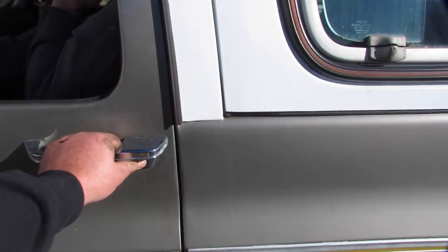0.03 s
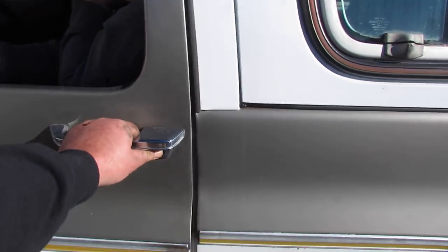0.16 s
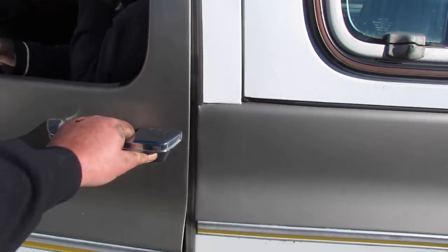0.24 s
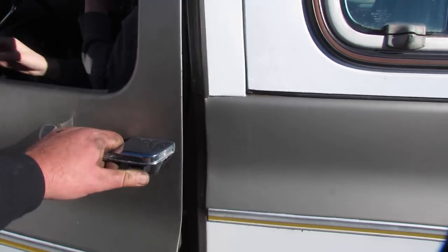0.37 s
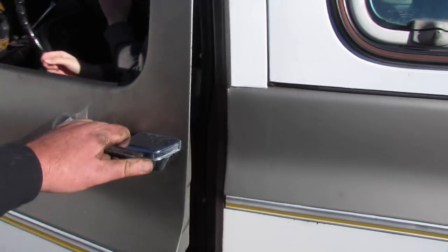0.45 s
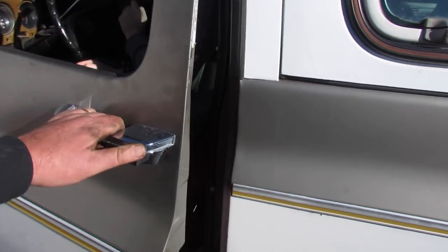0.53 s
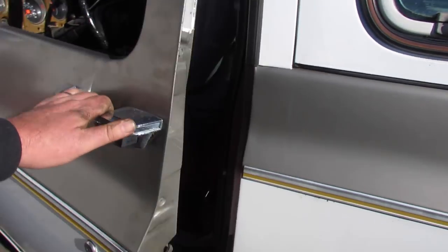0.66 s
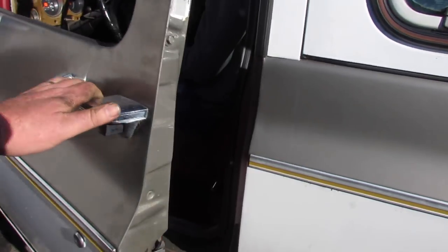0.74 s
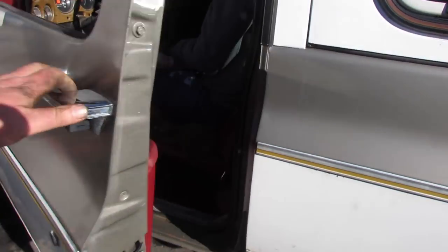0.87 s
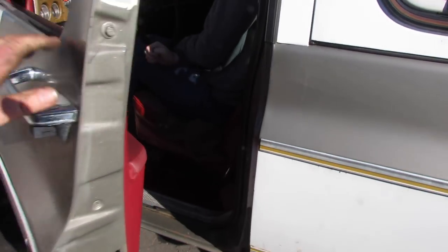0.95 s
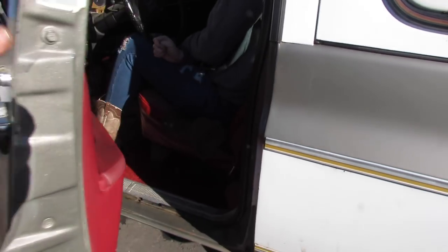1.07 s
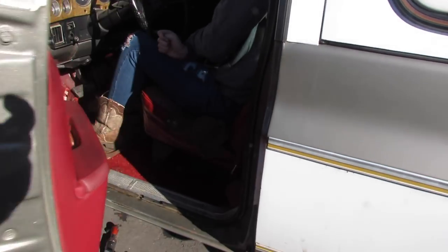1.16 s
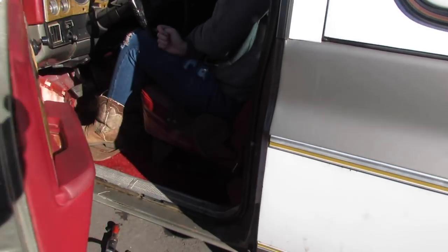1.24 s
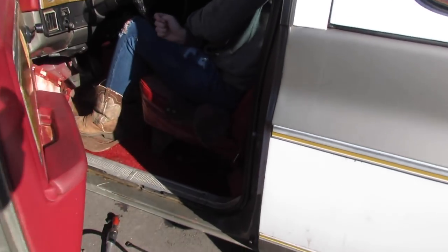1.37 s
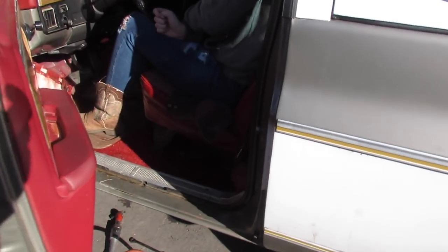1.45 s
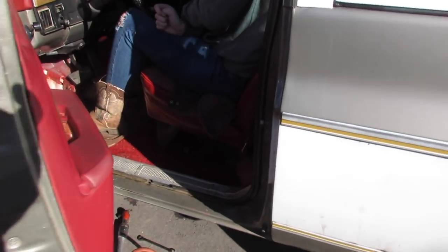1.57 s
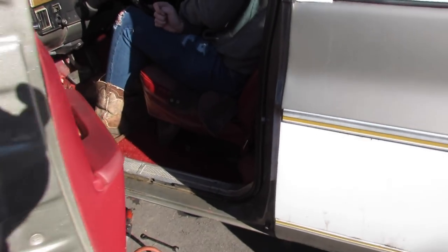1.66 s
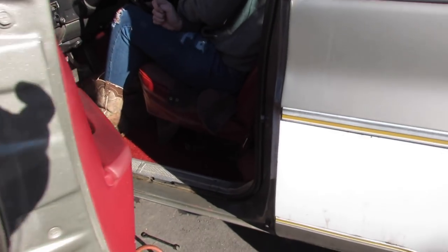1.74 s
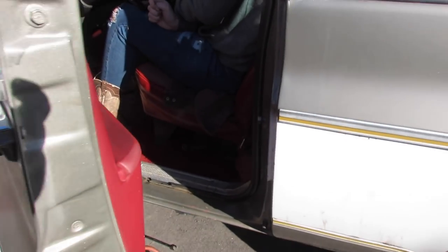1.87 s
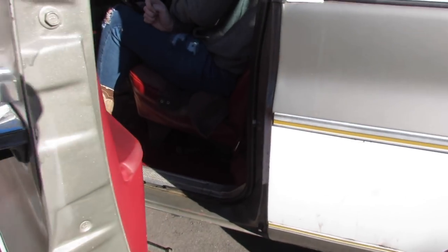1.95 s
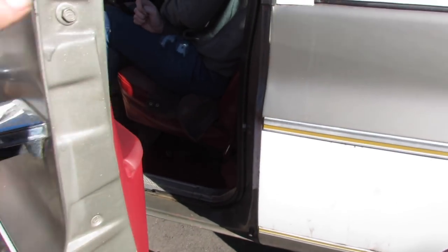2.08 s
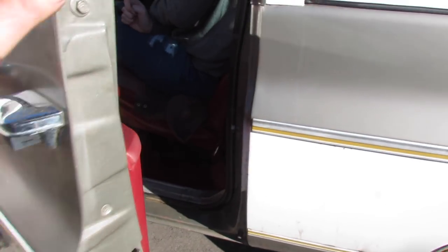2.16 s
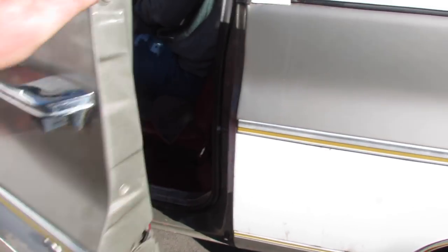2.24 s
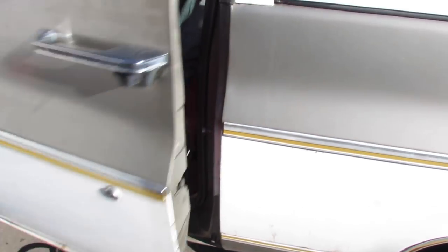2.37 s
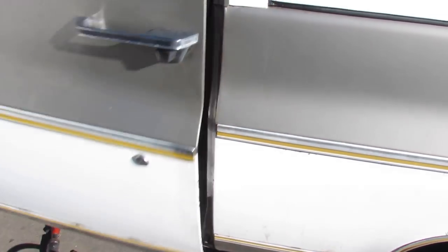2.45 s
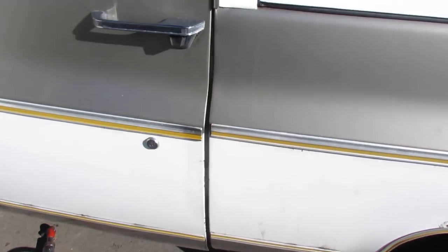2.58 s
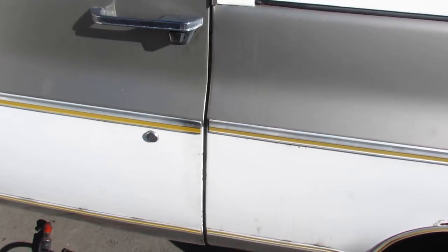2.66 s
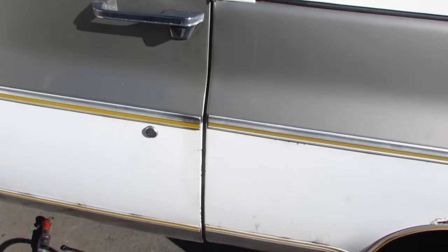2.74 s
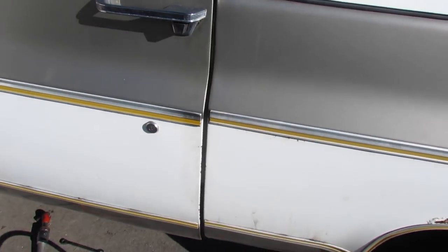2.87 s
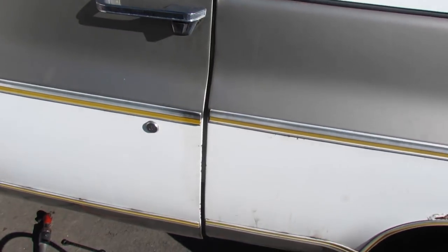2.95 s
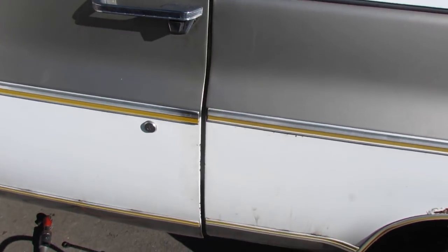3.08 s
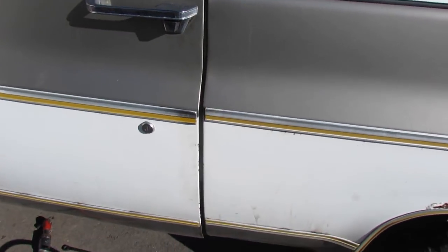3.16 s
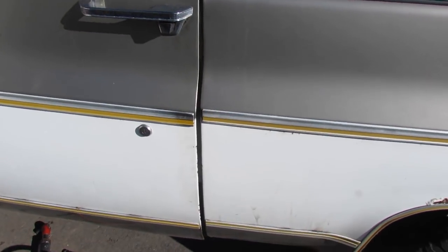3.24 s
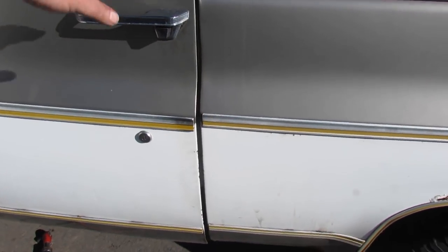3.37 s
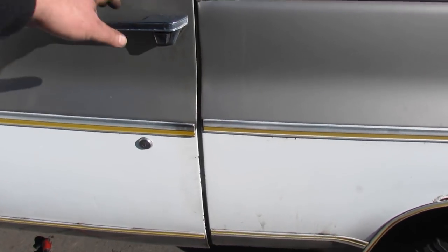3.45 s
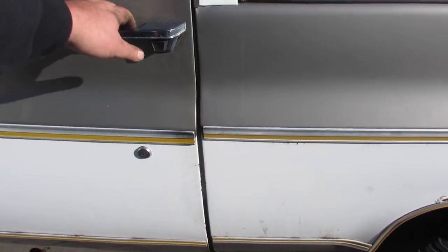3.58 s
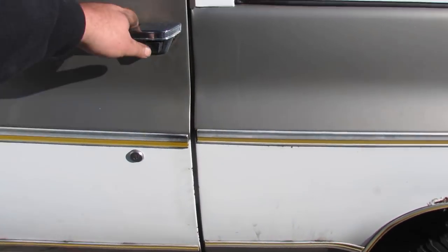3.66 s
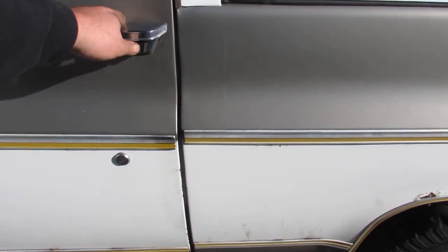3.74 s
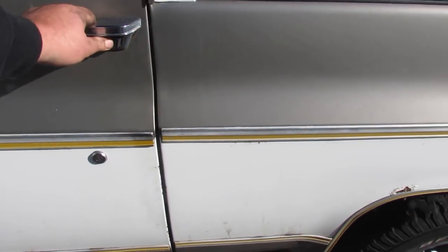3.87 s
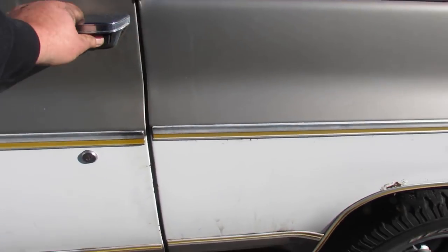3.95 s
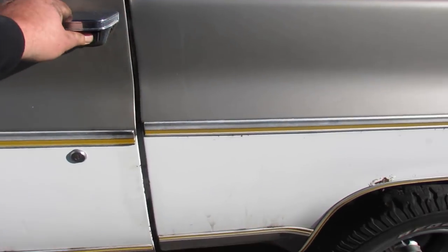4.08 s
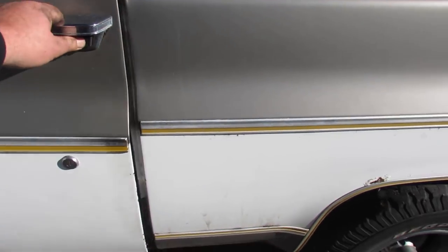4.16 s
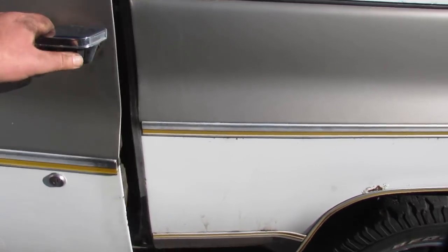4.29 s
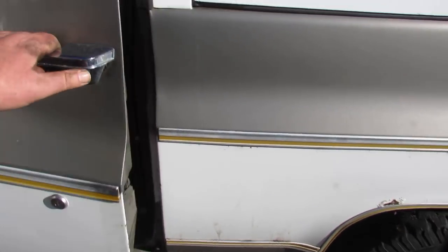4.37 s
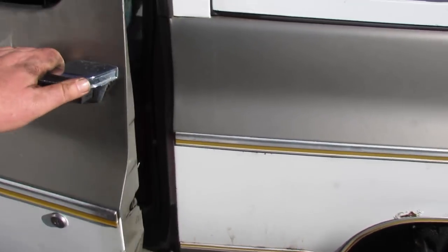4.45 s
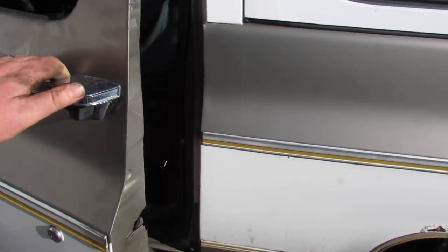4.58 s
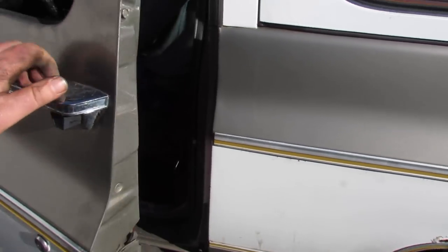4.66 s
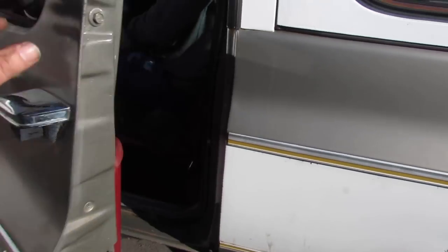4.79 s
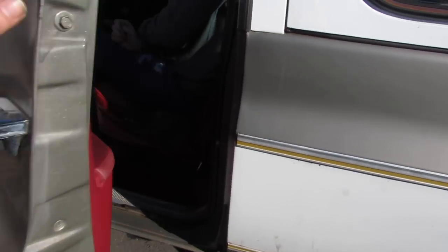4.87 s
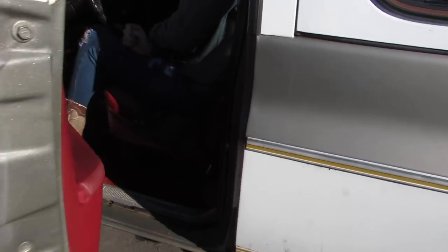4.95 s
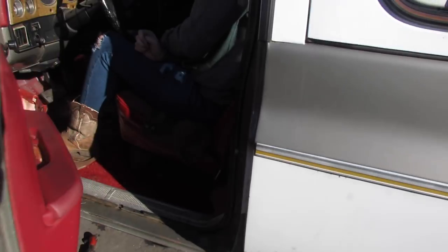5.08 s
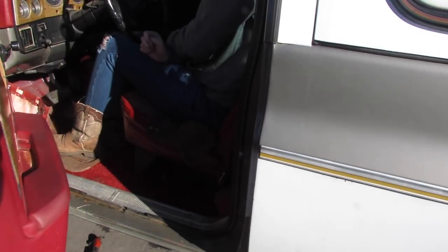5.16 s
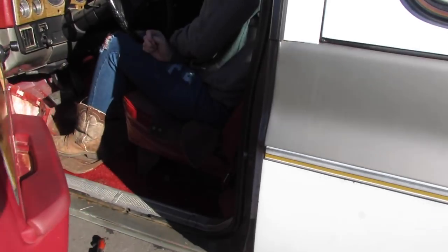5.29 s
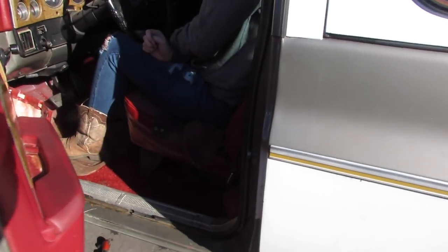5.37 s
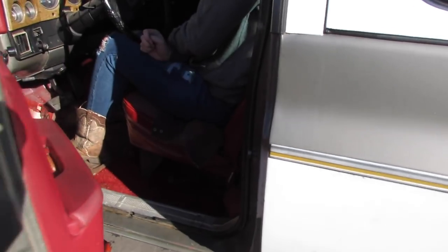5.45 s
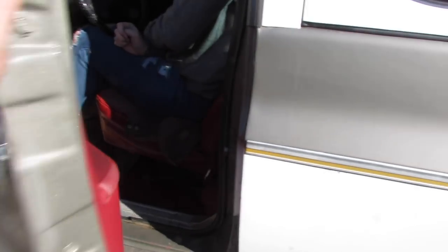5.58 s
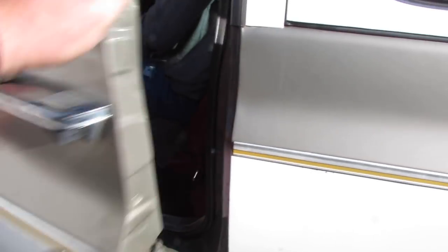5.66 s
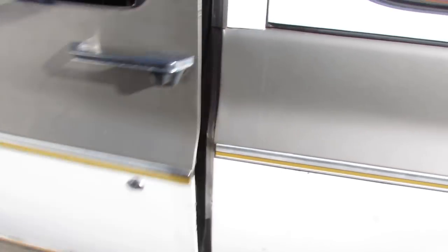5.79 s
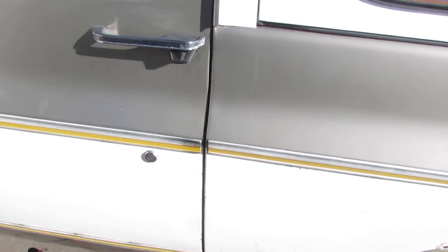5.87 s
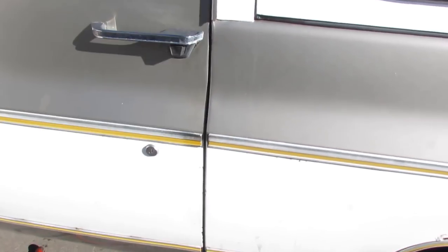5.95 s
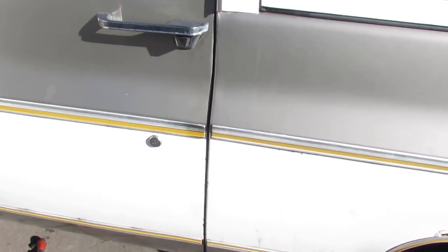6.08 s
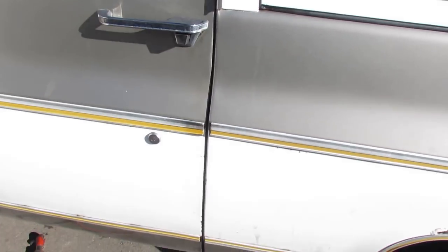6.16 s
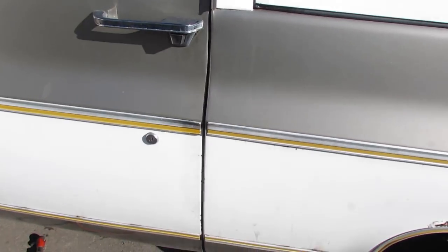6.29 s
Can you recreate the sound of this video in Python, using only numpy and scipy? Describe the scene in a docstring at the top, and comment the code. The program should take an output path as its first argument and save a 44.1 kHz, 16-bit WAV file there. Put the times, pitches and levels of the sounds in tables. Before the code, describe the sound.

An old vehicle's heavy steel door pops open with a crunch and latch clack, slams hard, then opens and slams again harder outdoors.

```python
"""An old truck's steel door is opened and slammed twice, outdoors and at arm's length, in steady rumble and hiss.
It pops off its seal with a crunch, the latch clacks free, the hinge grates, and the slam cracks and booms.
Then the button handle knocks, the latch lets go again, the stay bumps, and a harder slam leaves a spring singing.
Dense steel is decaying noise bands, distinct parts are decaying sines, and squeaks are wavering tones.
Loud peaks pull an automatic gain down; it holds, then creeps back."""
import sys
import numpy as np
from scipy import signal
from scipy.io import wavfile
from scipy.ndimage import minimum_filter1d

SR = 44100
rng = np.random.default_rng(int(sys.argv[2]) if len(sys.argv) > 2 else 0)


def unload_wav(signal):
    """Save mono or channel-first audio to the path in sys.argv[1] as 16-bit WAV at rate SR, clipped to [-1, 1]."""
    wavfile.write(
        sys.argv[1],
        SR,
        np.round(np.clip(np.atleast_2d(signal).T, -1, 1) * 32767).astype(np.int16),
    )


N = 278867

BAND_EDGES = 25 * 2 ** np.arange(0, 9.6, .5)   # half octaves, Hz
BAND_HZ = np.sqrt(BAND_EDGES[1:] * BAND_EDGES[:-1])
# resonances of the door panel: (f/Hz, width/Hz, level/dB)
PANEL = [(196, 20, -3), (280.4, 12, -4), (358, 15, -3), (732, 7.3, -3), (1490, 99, -4.5), (1723, 45, -2),
         (2025, 50, -3.5), (2417, 39, -3.5), (2690, 34, -6), (3017, 30, -7.5), (4100, 220, -11.5),
         (5013, 30, -8), (5850, 350, -8), (7070, 60, -1.5), (7350, 110, 0), (7920, 45, -1.5),
         (8600, 100, -4.5)]
# modes of the door skin: (f/Hz, level/dB, t60/s)
SKIN = [(112, -35, 0.27), (181, -24.5, .42), (385, -21, 0.14), (447, -19, .23), (655, -6.5, 0.03),
        (744, -20, 0.2), (772, -9, 0.085), (1357, -27, .16), (1728, -26, .13)]
# slams: (latch lands t/s, door speed/(m/s), t60 of the frame/s, t60 of the seating/s)
SLAMS = [(2.6027, 1.0, 0.6, 0.0743), (5.9363, 1.4, 0.37, 0.24)]
OVERSHOOT_M = 0.0098   # how far the door travels past the latch point until it seats
SLAM_DB_PER_DOUBLING = 2.5   # of the door speed
GRATE_START_S, GRATE_LENGTH_S = 1.039, 0.1146


def from_db(db):
    """Decibels to gain."""
    return 10 ** (np.asarray(db) / 20)


def rms_one(x):
    """Scale to an rms of 1."""
    return x / np.sqrt(np.mean(x ** 2) + 1e-20)


def at_hz(points, hz):
    """Read a spectrum on a log-frequency axis."""
    f, value = np.transpose(points)
    return np.interp(np.log(hz), np.log(f), value)


def add(out, s, sound):
    """Mix a sound in at a time."""
    start = max(round(s * SR), 0)
    out[..., start:start + sound.shape[-1]] += sound[..., :N - start]


def drift(rate_hz, size=N):
    """Smooth chance of spread 1, drawn at every 16th sample."""
    r = np.exp(-2 * np.pi * rate_hz * 16 / SR)
    draws = rng.standard_normal(size // 16 + 3002)
    slow = signal.lfilter([1], [1, -2 * r, r * r], draws)[3000:]   # skip the filter's start-up
    return np.interp(np.arange(size) / 16, np.arange(len(slow)), rms_one(slow))


def band_pass(x, order, edges_hz):
    """Keep only what lies between two edges."""
    return signal.sosfilt(signal.butter(order, edges_hz, "band", fs=SR, output="sos"), x)


def low_pass(x, cutoff_hz):
    """Take the treble off above a cutoff."""
    return signal.sosfilt(signal.butter(4, cutoff_hz, fs=SR, output="sos"), x)


def noise_bands(width):
    """Half-octave bands of stereo noise, each of rms 1: bands x 2 x N."""
    # (f/Hz, left minus right level/dB)
    balance = [(50, -3.5), (250, -0.8), (500, -1), (1000, -1.7), (4000, -0.4), (14000, 0)]
    white, bands = rng.standard_normal((2, 2, N)), []
    for k, hz in enumerate(BAND_HZ):
        mid, side = band_pass(white[k % 2], 2, BAND_EDGES[k:k + 2])   # neighbours use different noise
        pair = mid + from_db(at_hz(width, hz)) * side * [[1], [-1]]
        left_right_db = at_hz(balance, hz) / 2 * np.array([[1], [-1]])
        bands.append(rms_one(pair * from_db(left_right_db)))
    return np.array(bands, dtype=np.float32)


def resonate(x, resonances):
    """A sound plus the ringing that it raises in a body."""
    out = x.copy()
    for hz, width, db in resonances:
        r = np.exp(-np.pi * width / SR)
        poles = [1, -2 * r * np.cos(2 * np.pi * hz / SR), r * r]
        out += from_db(db) * (1 - r * r) / 2 * signal.lfilter([1, 0, -1], poles, x + 1e-18)
    return out


def blows(table, bands, colour_db, t60, pan_db, rattle_db, snap_db, snap_t60,
          tail_db, tail_stretch, damping, rise_s):
    """Noise bands stand for dense steel modes: each blow (s, dB, tilt) has a snap, a ring and a fainter tail."""
    # where each kind of blow has its colour set: (f/Hz)
    colour_hz = (200, 900, 3000, 9000)
    pivot_hz = 1800   # a blow's tilt turns about this
    out = np.zeros((2, N))
    chatter = from_db(rattle_db * (drift(200) - 1 / 10 * rattle_db))   # loose parts buzz against each other
    colour = from_db(at_hz(list(zip(colour_hz, colour_db)), BAND_HZ))
    colour = colour / (1 + (105 / BAND_HZ) ** 3)   # a panel radiates little deep bass
    colour = colour / np.sqrt(1 + (BAND_HZ / 11000) ** 6)
    for (s, db, tilt), ring_s in zip(table, np.broadcast_to(t60, len(table))):
        start = round(s * SR)
        t = (np.arange(min(int(ring_s * tail_stretch * SR), N - start)) / SR).astype(np.float32)
        # t60 holds at 1 kHz; higher bands die sooner
        decay = np.outer((BAND_HZ / 1000) ** damping, t).astype(np.float32)
        ring = np.exp(-np.log(1000) / ring_s * decay)
        tail = from_db(tail_db) * ring ** np.float32(1 / tail_stretch)
        snap = from_db(snap_db - 60 * t / snap_t60)
        # a mode builds over the contact, or over one cycle if that is longer
        rise = np.minimum(t / np.maximum(1 / BAND_HZ, rise_s)[:, None], 1)
        gains = colour * from_db(db + tilt * np.log2(BAND_HZ / pivot_hz))
        envelope = gains[:, None] * rise * np.sqrt(ring ** 2 + tail ** 2 + snap ** 2)
        add(out, s, np.einsum("bt,bct->ct", envelope, bands[:, :, start:start + len(t)]))
    return out * chatter * from_db([[pan_db / 2], [-pan_db / 2]])


def strikes(hits, modes, spread_db=0):
    """A hard contact rings a few distinct modes; a loose part shares them out differently each time."""
    out, t = np.zeros(N), np.arange(int(2 * SR * max(t60 for *_, t60 in modes))) / SR
    rings = np.array([from_db(db - 60 * t / t60) * np.sin(2 * np.pi * hz * t) for hz, db, t60 in modes])
    for (s, db), luck in zip(hits, rng.standard_normal((len(hits), len(modes)))):
        add(out, s, from_db(db + spread_db * luck) @ rings)
    return out


def squeaks(table, waver=0.031, grip_db=5.0):
    """Dry metal sliding: short tones whose pitch and strength waver as it sticks and slips."""
    out = np.zeros(N)
    for s, length, hz, db in table:
        size = int(length * SR)
        phase = 2 * np.pi * np.cumsum(hz * (1 + waver * drift(500, size))) / SR
        grip = rms_one(from_db(grip_db * drift(150, size)))
        fade = signal.windows.tukey(size, .5)
        add(out, s, from_db(db) * np.sqrt(2) * fade * grip * np.sin(phase))
    return out


def air_layer(bands, spectrum, patchy_db, rate_hz):
    """Steady noise whose bands swell each on their own; rms 1."""
    gains = from_db(at_hz(spectrum, BAND_HZ)) * np.sqrt(BAND_HZ)   # per-Hz density to band level
    return rms_one(sum(g * from_db(patchy_db * drift(rate_hz)) * band for g, band in zip(gains, bands)))


def sleeve():
    """A sleeve brushes past: swells of band-limited noise."""
    # (t/s, length/s, level/dB)
    brushes = [(2.25, 0.6, -56), (4.955, 0.14, -46), (5.765, 0.1, -46.5)]
    stroke = np.zeros(N)
    for start, length, db in brushes:
        add(stroke, start, from_db(db) * np.hanning(int(length * SR)))
    cloth = band_pass(rng.standard_normal((2, N)), 2, [5000, 13500])
    return stroke * rms_one(cloth)


def outdoors():
    """A lumpy low rumble, a smooth hiss, and cloth brushing close by."""
    # outdoor air through each opening of the door: (t/s, rumble level/dB, hiss level/dB), before the trims
    air_level = [
        [(0.0, -43.5, -52.5), (0.33, -42, -45.5), (0.49, -43.5, -49.5), (2.21, -45.5, -52.5), (2.4, -41.5, -51)],
        [(4.0, -38.5, -39), (4.102, -35.5, -43.5), (4.498, -42, -49), (5.726, -42.5, -49.5), (5.85, -36.5, -50),
         (6.2, -44, -46)],
    ]
    # spectra of the two layers: (f/Hz, level per Hz/dB)
    rumble_spectrum = [(15, -45), (25, -10.5), (119, -1.5), (176, -2), (207, -2.5), (353, -4.5), (462, -7),
                       (514, -10), (661, -6.5), (1070, -13), (1800, -24.5), (2340, -43), (3960, -120)]
    hiss_spectrum = [(880, -28), (1500, 1), (2040, -4.5), (3620, -5), (4420, -8), (7320, -12.5),
                     (12200, -17.5), (15100, -27), (16000, -8)]
    # width of the air: (f/Hz, side minus mid level/dB)
    air_width = [(60, -2), (180, -11.5), (550, -6), (1650, 1.5), (4970, -3.5), (15000, 3)]
    rumble_trim_db, hiss_trim_db = 2, 3
    bands, (s, rumble_db, hiss_db) = noise_bands(air_width), np.concatenate(air_level).T
    t = np.arange(N) / SR
    rumble = air_layer(bands, rumble_spectrum, patchy_db=1.97, rate_hz=7.1)
    hiss = air_layer(bands, hiss_spectrum, patchy_db=0.74, rate_hz=4.1)
    rumble = rumble * from_db(rumble_trim_db + np.interp(t, s, rumble_db))
    hiss = hiss * from_db(hiss_trim_db + np.interp(t, s, hiss_db))
    return rumble + hiss + sleeve()


def jolts(bands):
    """The whole door shudders; the jolt that pops it off its seal also kicks the skin."""
    # the door strains, pops off its seal, shakes as it swings, or settles in its frame:
    # (t/s, level/dB, tilt/(dB/octave), t60/s)
    shakes = [(0.041, -20, -1, 0.17), (0.0529, -3.5, -0.7, 0.23), (2.42, -28, 0.5, 0.9),
              (5.977, 5.5, -2.2, 0.35)]
    # colour of a jolt: (level/dB) at the blow frequencies
    jolt_colour = (-24, -16.5, -25, -23)
    skin_pop_db = -1.5
    shudder = blows([row[:3] for row in shakes], bands, jolt_colour, t60=[row[3] for row in shakes],
                    pan_db=0.0, rattle_db=2.0, snap_db=-7.5, snap_t60=.025,
                    tail_db=-19.0, tail_stretch=1.3, damping=0.11, rise_s=0.00037)
    return resonate(shudder, PANEL) + strikes([(shakes[1][0], skin_pop_db)], SKIN)


def crunch(bands, count=6):
    """As the door pops, the jaw drags over the striker in quick, uneven, fading slips."""
    # colour of a slip: (level/dB) at the blow frequencies
    crunch_colour = (-43, -34.5, -29, -33)
    # resonances of the dragging jaw: (f/Hz, width/Hz, level/dB)
    crunch_body = [(500, 90, -0.5), (774, 60, 10), (1740, 200, 12), (3170, 250, 2), (4280, 140, 7),
                   (4580, 150, 9.5)]
    start_s, length_s, fade_db = 0.053, 0.046, 9.5
    progress = (np.arange(count) + rng.uniform(0, 1 / 2, count)) / count
    slips = [(start_s + length_s * p, -fade_db * p, 0) for p in progress]
    drag = blows(slips, bands, crunch_colour, t60=0.036, pan_db=-2.0, rattle_db=1.5, snap_db=-4,
                 snap_t60=0.011, tail_db=-23, tail_stretch=2.5, damping=0.083, rise_s=.0006)
    return resonate(drag, crunch_body)


def latch(bands):
    """The pawl squeaks off its tooth, the jaw clacks free and plucks its spring; at other times it clacks loosely."""
    # the loose jaw clacks: (t/s, level/dB, tilt/(dB/octave))
    loose_clacks = [(.159, -13.5, -2), (0.4258, 2, -0.5), (.588, -18, -1), (2.576, -10, -1),
                    (2.669, 8.5, 0), (2.6755, 18, 0.8), (2.9572, -0.5, -1.5), (3.9496, -0.5, 3),
                    (4.323, -7, -3.5), (4.341, -14.5, -2), (6.094, 3, 1.5)]
    # the latch lets go: (t/s, level/dB, tilt/(dB/octave))
    let_go = [(0.3633, 2.3, -0.3), (4.239, -0.5, 0.5)]
    # colour of a clack: (level/dB) at the blow frequencies
    latch_colour = (-47, -34.5, -26, -24)
    # resonances of the pawl as it lets go, then of the jaw: (f/Hz, width/Hz, level/dB)
    pawl_body = [(4540, 260, 5.5), (5270, 160, 7), (8650, 150, -3)]
    jaw_body = [(1340, 120, 6.5), (1865, 160, 4.5), (2257, 160, 3.5), (2590, 150, 1.5), (2977, 70, -1),
                (6730, 200, -12), (9770, 400, -1.5)]
    # the return spring twangs on its own: (t/s, level/dB)
    plucks = [(0.5893, 1.5)]
    # modes of the return spring: (f/Hz, level/dB, t60/s)
    spring_modes = [(1250, -32.5, 0.11), (2680, -36.5, 0.082), (5090, -39, 0.11), (6000, -43, 0.1),
                    (6470, -32.5, 0.09), (6650, -39, .06), (11300, -45, .06)]
    pawl_lead_s, pawl_hz, pawl_db, release_spring_db = .022, 1304, -29, 6
    pawl = squeaks([(s - pawl_lead_s, pawl_lead_s, pawl_hz, pawl_db) for s, _, _ in let_go])
    releases, clacks = (blows(table, bands, latch_colour, t60=0.15, pan_db=0.0, rattle_db=1.0,
                              snap_db=-3.0, snap_t60=0.031, tail_db=-8.5, tail_stretch=2.18,
                              damping=0.42, rise_s=0.0016) for table in (let_go, loose_clacks))
    jaw = low_pass(resonate(releases, pawl_body) + clacks, 14000)
    spring = strikes([(s, release_spring_db) for s, _, _ in let_go] + plucks, spring_modes)
    return pawl + resonate(resonate(jaw, jaw_body), PANEL) + spring


def ticks(bands, t60=.025, skirt_db_per_octave=13.5):
    """Small loose parts give a short burst around a pitch of their own."""
    # (t/s, level/dB, f/Hz)
    small_parts = [(0.176, -26, 1500), (0.673, -35, 11000), (0.7519, -28, 3760), (.802, -34.5, 2980),
                   (0.836, -33, 3000), (0.8678, -36, 3140), (1.868, -40.5, 2500), (2.289, -49, 11000),
                   (2.346, -48, 13000), (2.459, -39.5, 3500), (2.909, -36, 9980), (2.9575, -19.5, 8000),
                   (3.112, -28.5, 1400), (3.385, -31.5, 1500), (3.8255, -33, 12000), (3.9505, -11.5, 8500),
                   (4.2395, -15, 6000), (4.336, -28, 8600), (4.363, -35, 11000)]
    out, t = np.zeros((2, N)), np.arange(SR // 10) / SR
    for s, db, hz in small_parts:
        start = round(s * SR)
        gains = from_db(db - skirt_db_per_octave * np.abs(np.log2(BAND_HZ / hz)))
        burst = np.tensordot(gains, bands[:, :, start:start + len(t)], 1)
        add(out, s, burst * from_db(-60 * t / t60))
    return resonate(out, PANEL)


def dry_squeaks():
    """Handle spring and hinge squeak as dry metal slides."""
    # (t/s, length/s, f/Hz, level/dB)
    squeak_events = [(.271, 0.043, 3530, -38.5), (.24, 0.075, 6930, -41), (.275, 0.031, 10600, -48),
                     (.834, 0.02, 1220, -35.5), (1.192, 0.018, 1464, -42.5), (4.171, 0.037, 6940, -39.5),
                     (4.343, 0.037, 6570, -43), (4.362, 0.024, 2260, -42), (5.117, 0.019, 1480, -39),
                     (5.682, 0.015, 4880, -44)]
    return squeaks(squeak_events)


def hinge(bands, count=16):
    """The hinge knocks loose and grates with a few hard snaps; the stay bumps and kicks the door skin."""
    # the hardest slips snap out of the grating: (t/s, level/dB, tilt/(dB/octave))
    hard_slips = [(1.0535, -10, 0), (1.0882, -11, -0.5), (1.098, -10, 0), (1.1125, -13, 1.5),
                  (1.1172, -6.5, 0), (1.1235, -13, 0.5), (1.1482, -10, -1)]
    # the door stay and the cab bump: (t/s, level/dB, tilt/(dB/octave))
    stay_bumps = [(1.26, -15, -2), (1.266, -14, -2.5), (1.565, -0.5, -1.1), (4.406, -12, -3.5),
                  (4.872, -12, -2.5), (4.92, -16, -2), (5.195, -13, -2.5), (5.44, -16, -2.5),
                  (5.703, -8, -3.5), (5.7225, 0, 6)]
    # colours of slip and bump: (level/dB) at the blow frequencies
    hinge_colour = (-56, -38.5, -25, -35.5)
    bump_colour = (-38.5, -37.5, -53.5, -60.5)
    # resonances of the door stay: (f/Hz, width/Hz, level/dB)
    stay = [(272, 63, 4.9), (511, 21, 12), (635, 16.6, 6.4), (787, 13, 0.5), (2333, 55, 3)]
    # modes of the hinge bracket, rung as it breaks loose: (f/Hz, level/dB, t60/s)
    bracket = [(692, -27, 0.1), (1400, -35, 0.071), (1535, -32, .08)]
    slip_base_db, swell_db, scatter_db, skin_bump_db = -24.5, 8, 0.5, -23.5
    progress = (np.arange(count) + rng.uniform(1 / 2, 1, count)) / count
    # uneven slips swell and fade
    slip_db = slip_base_db + swell_db * np.sin(np.pi * progress ** 2) + rng.normal(0, scatter_db, count)
    slips = [(GRATE_START_S, 0, 0)]   # the knock that breaks it loose
    slips += [(GRATE_START_S + GRATE_LENGTH_S * p, db, 0) for p, db in zip(progress, slip_db)]
    grate = blows(slips, bands, hinge_colour, t60=0.068, pan_db=-1.0, rattle_db=1.5, snap_db=-9, snap_t60=.02,
                  tail_db=-17.0, tail_stretch=4.7, damping=0.044, rise_s=0.003)
    snaps = blows(hard_slips, bands, hinge_colour, t60=0.02, pan_db=-1.0, rattle_db=1.0, snap_db=0,
                  snap_t60=.006, tail_db=-18.0, tail_stretch=5.0, damping=0.1, rise_s=0.0003)
    bumps = blows(stay_bumps, bands, bump_colour, t60=0.14, pan_db=-1.0, rattle_db=-0.5, snap_db=-20,
                  snap_t60=.025, tail_db=-24.5, tail_stretch=3.8, damping=0.083, rise_s=.003)
    skin = strikes([(s, skin_bump_db + db) for s, db, _ in stay_bumps], SKIN)
    body = resonate(resonate(grate + snaps + bumps, stay), PANEL)
    return body + skin + strikes([(GRATE_START_S, 0)], bracket)


def grit(low_hz=600, high_hz=7500):
    """Dry grains of uneven size crackle in the hinge and ring its pin."""
    # resonances of the hinge pin: (f/Hz, width/Hz, level/dB)
    pin = [(700, 90, 14), (1550, 200, 12), (2300, 400, 13), (4300, 900, 1)]
    grains_per_s, grit_db, size_spread_db = 800, -41, 5
    size, out = int(GRATE_LENGTH_S * SR), np.zeros(N)
    born = rng.random(size) < grains_per_s / SR
    sizes = from_db(size_spread_db * rng.standard_normal(size)) * rng.choice([-1, 1], size)
    grains = band_pass(born * sizes, 1, [low_hz, high_hz])
    crackle = rms_one(resonate(grains, pin)) * signal.windows.tukey(size, .5)
    add(out, GRATE_START_S + GRATE_LENGTH_S / 10, from_db(grit_db) * crackle)
    return out


def slams(bands):
    """The door meets seal, catch, frame and seat in turn: the faster it moves, the closer and louder they come."""
    # colours of the four contacts: (level/dB) at the blow frequencies
    seal_colour = (-33, -35, -36.5, -48)
    catch_colour = (-47, -40, -26.5, -29.5)
    frame_colour = (-13, -9.3, -9.2, 1)
    seat_colour = (-22.5, -5, -0.5, -3.5)
    # the broad clank of the catch as the door comes in: (f/Hz, width/Hz, level/dB)
    catch_body = [(1750, 250, -4), (2150, 480, 2.5), (2670, 300, -2)]
    # modes of striker and cab: (f/Hz, level/dB, t60/s)
    striker_modes = [(744, -9, 0.057), (1565, -1, 0.025), (2350, -7, .018), (3600, -9, .015),
                     (4790, -9, 0.018), (7610, 3, 0.011), (7380, 2, 0.018), (8380, -1, 0.012),
                     (10600, -13.5, 0.0053)]
    cab_modes = [(44, -36, .25), (63, -45, 1.8), (92, -34, .5), (140, -33, .6), (197, -26, .65),
                 (284, -28, .45), (447, -33, .35), (745, -20, .3), (1485, -25, .3)]
    # the slower slam springs back against the striker: (t/s, level/dB)
    rebounds = [(2.6761, 8)]
    seal_gap_m, catch_gap_m = .096, .034   # ahead of the point where the latch lands
    seal_follows, striker_follows = 0.55, 0.33   # shares of the level that speed adds
    striker_db = 8.6   # the latch's crack at 1 m/s
    s, speed, frame_t60, seat_t60 = np.transpose(SLAMS)
    db = SLAM_DB_PER_DOUBLING * np.log2(speed)

    def contact(past_m, follows=1):
        """The blows at a point of the door's travel past the striker."""
        return [(when, level, 0) for when, level in zip(s + past_m / speed, follows * db)]

    seal = blows(contact(-seal_gap_m, seal_follows), bands, seal_colour, t60=0.21, pan_db=0.5, rattle_db=0.5,
                 snap_db=-12.5, snap_t60=.025, tail_db=-15.0, tail_stretch=1.7, damping=0.26, rise_s=.003)
    catch = blows(contact(-catch_gap_m), bands, catch_colour, t60=0.23, pan_db=1.0, rattle_db=0.5,
                  snap_db=-5.5, snap_t60=.02, tail_db=-19.5, tail_stretch=2.0, damping=0.25, rise_s=0.002)
    frame = blows(contact(0), bands, frame_colour, t60=frame_t60, pan_db=-0.7, rattle_db=1.5,
                  snap_db=-8, snap_t60=.025, tail_db=-16.0, tail_stretch=1.9, damping=0.34, rise_s=0.0016)
    seat = blows(contact(OVERSHOOT_M), bands, seat_colour, t60=seat_t60, pan_db=2.0, rattle_db=0.0,
                 snap_db=-11, snap_t60=.025, tail_db=-16.5, tail_stretch=1.2, damping=0.17, rise_s=.001)
    cracks = list(zip(s, striker_db + striker_follows * db))
    striker = strikes(cracks, striker_modes)
    striker += strikes(rebounds, striker_modes[1:])   # a rebound is too light to stir the lowest mode
    cab = strikes(cracks + rebounds, cab_modes)
    return resonate(resonate(seal + catch, catch_body) + frame + seat, PANEL) + striker + cab


def sheet():
    """Both slams set the same modes of the sheet steel ringing as the door seats."""
    # (f/Hz, level/dB, t60/s)
    sheet_modes = [(590, -3, .36), (818, -3, .3), (904, -3, .32), (948, -3, .25), (1147, -5, .35),
                   (1222, -5, .35), (1395, -2, .3), (1427, -3, .28), (1555, -1, .25), (1838, -3, .32),
                   (1940, -4, .25), (2029, -3, .3), (2394, -5, .27), (2552, -7, .26), (2713, -6, .25),
                   (2895, -6, .27), (3047, -6, .22), (3750, -7, .23), (5013, -6, .2), (6934, -5, .18)]
    sheet_db = -14   # at 1 m/s
    hits = [(s + OVERSHOOT_M / speed, sheet_db + SLAM_DB_PER_DOUBLING * np.log2(speed))
            for s, speed, *_ in SLAMS]
    return strikes(hits, sheet_modes, spread_db=2)


def rattle(count=12):
    """After each slam window and rods strike at uneven moments, with a new share of their modes each time."""
    # modes of the loose parts: (f/Hz, level/dB, t60/s)
    loose_modes = [(590, -3, .06), (942, -2, .05), (1180, -2, .04), (1410, -1, .04), (1960, -1.5, .035),
                   (2870, -1, .025), (4050, -2.5, .018), (5860, -2, .012), (8100, -3, .01)]
    delay_s, length_s, first_db, fade_db = .01, .11, -12.2, 15
    hits = []
    for s, *_ in SLAMS:
        progress = (np.arange(count) + rng.random(count)) / count
        hits += [(s + delay_s + length_s * p, first_db - fade_db * p) for p in progress]
    return strikes(hits, loose_modes, spread_db=6)


def thuds():
    """After the latch the skin slaps and the inner panel thuds against its frame as the door shakes."""
    # (t/s, skin level/dB, inner panel level/dB)
    thud_events = [(2.6165, 3, -9), (2.644, -12, -2), (2.674, -12, 0), (5.9455, 4.5, -6), (5.9773, -1, 5),
                   (6.063, -12.5, -6), (6.094, -18, -5)]
    # modes of the inner panel: (f/Hz, level/dB, t60/s)
    inner_panel = [(199, -10, .09), (275, -10, .07), (375, -11, .06), (560.4, -14, .05)]
    skin = strikes([(s, db) for s, db, _ in thud_events], SKIN)
    return skin + strikes([(s, db) for s, _, db in thud_events], inner_panel)


def button(bands):
    """Button and rods knock behind the door skin; the rod rings, and each contact adds a pitch of its own."""
    # (t/s, level/dB, tilt/(dB/octave), contact ring f/Hz, contact ring level/dB)
    knock_events = [(3.8107, 0.5, 1.5, 2700, -33), (3.815, -19, -2, 1230, -25), (3.893, -5, 2.5, 1150, -33),
                    (3.9135, 3, -1.5, 1480, -13), (3.942, 2.5, -1, 1310, -25), (4.0333, -5, 2, 830, -6),
                    (4.0368, -10, 1, 1080, -12), (4.0393, -8, 0, 1450, -8), (4.052, -15, -2, 1400, -20),
                    (4.1375, 2.5, -0.5, 790, -8.5), (4.139, -3, -0.8, 1526, -3.5)]
    # colour of a knock: (level/dB) at the blow frequencies
    button_colour = (-45, -22, -24.5, -30)
    # resonances of the handle: (f/Hz, width/Hz, level/dB)
    handle = [(387, 13, 10.5), (750, 150, 3), (1360, 190, 6)]
    # modes of the rod and its bracket: (f/Hz, level/dB, t60/s)
    rod_modes = [(359, -51, 0.2), (752, -28, 0.069), (1074, -39, 0.065), (1365, -39, 0.079),
                 (1500, -27, 0.066)]
    rod_db, contact_t60_s = -2.5, .03   # the rod's ring is set for a 0 dB knock
    knocks = blows([row[:3] for row in knock_events], bands, button_colour, t60=0.09, pan_db=1.5,
                   rattle_db=2.5, snap_db=-8, snap_t60=0.0061, tail_db=-12.5, tail_stretch=2.58,
                   damping=0.26, rise_s=0.00054)
    muffled = low_pass(knocks, 10800)
    rod = strikes([(row[0], rod_db + row[1]) for row in knock_events], rod_modes, spread_db=3)
    contacts = sum(strikes([(s, db)], [(hz, 0, contact_t60_s)]) for s, _, _, hz, db in knock_events)
    return resonate(resonate(muffled, handle), PANEL) + rod + contacts


def door_check():
    """The door check snaps over its notch as the door is flung, and its modes ring."""
    # (f/Hz, level/dB, t60/s)
    check_modes = [(770, -9, 0.074), (818, -3.5, .06), (1066, -14, .11), (1714, -18, .13), (2780, -21, .14),
                   (4040, -21.5, .12)]
    snap_s, snap_db = 5.7225, -23
    return strikes([(snap_s, snap_db)], check_modes)


def singing_spring():
    """The harder slam leaves a spring singing: one long, slowly dying mode."""
    return strikes([(5.94, 0)], [(1012, -34, 3)])   # hit (s, dB); mode (Hz, dB, t60 s)


def door():
    """All parts of the door, sharing one set of noise bands."""
    # width of the door: (f/Hz, side minus mid level/dB)
    door_width = [(60, -2.5), (150, -8.5), (380, -11), (950, -8), (2380, -4), (5980, -5.5), (15000, -4)]
    bands = noise_bands(door_width)
    opening = jolts(bands) + crunch(bands) + latch(bands) + ticks(bands) + dry_squeaks()
    swinging = hinge(bands) + grit() + button(bands) + door_check()
    closing = slams(bands) + sheet() + rattle() + thuds() + singing_spring()
    return opening + swinging + closing


def scene():
    """The door in the open air, which comes a little from the right."""
    return door() + outdoors() * from_db([[-.4], [.4]])


def gain_control(x, hold_s=0.61, release_db_per_s=15.0):
    """Peaks near full scale pull the gain down within a few milliseconds; it holds, then creeps back."""
    threshold_db, attack_s = -1, .0018
    over = np.maximum(20 * np.log10(np.abs(x).max(axis=0) + 1e-9) - threshold_db, 0)
    size = int(hold_s * SR)
    held = -minimum_filter1d(-over, size, origin=(size - 1) // 2, mode="constant")
    slope = release_db_per_s * np.arange(N) / SR
    reduction_db = np.maximum.accumulate(held + slope) - slope   # falls no faster than the release
    r = np.exp(-1 / (attack_s * SR))
    return x * from_db(-signal.lfilter([1 - r], [1, -r], reduction_db))


def record(dry):
    """A low cut, gain control, clipping of what slips past it, and a steep top cut."""
    cutoff_hz = 16000
    lean = signal.sosfilt(signal.butter(1, 35, "high", fs=SR, output="sos"), dry)
    clipped = np.clip(gain_control(lean), -1, 1)
    return signal.sosfilt(signal.ellip(10, .1, 80, cutoff_hz, fs=SR, output="sos"), clipped)


dry = scene()
out = record(dry)
unload_wav(out)
```